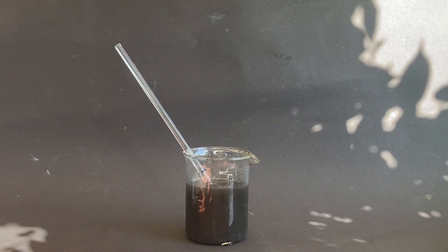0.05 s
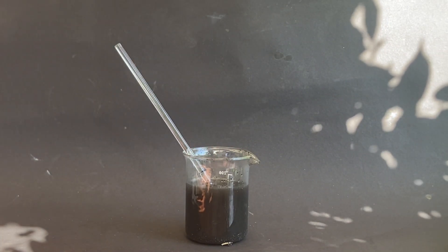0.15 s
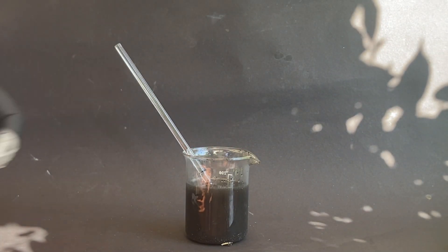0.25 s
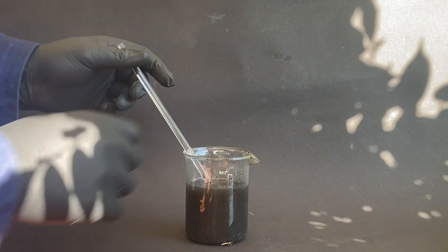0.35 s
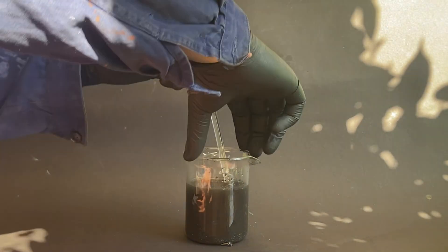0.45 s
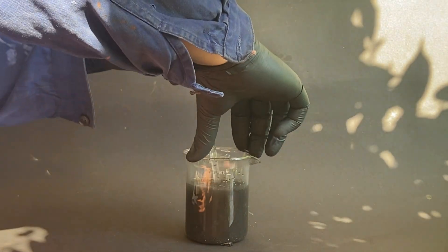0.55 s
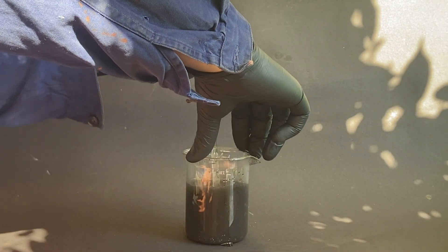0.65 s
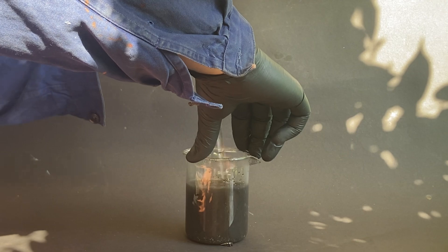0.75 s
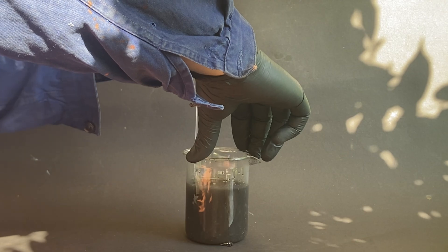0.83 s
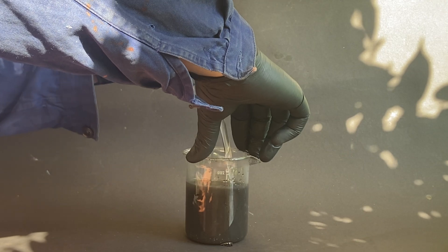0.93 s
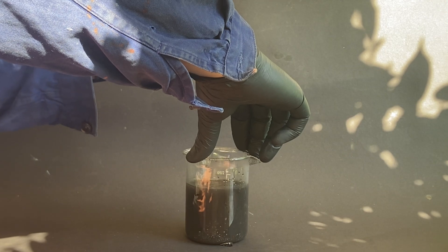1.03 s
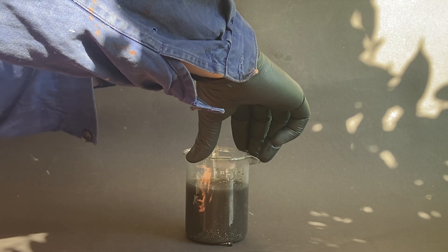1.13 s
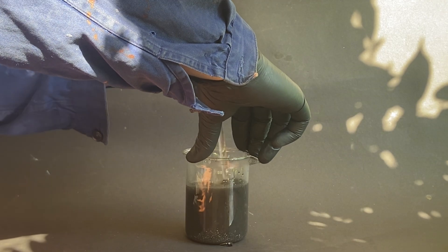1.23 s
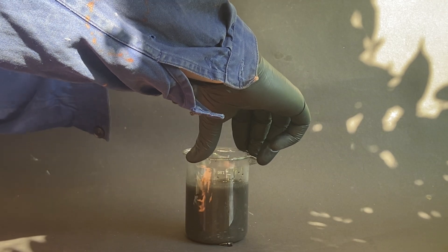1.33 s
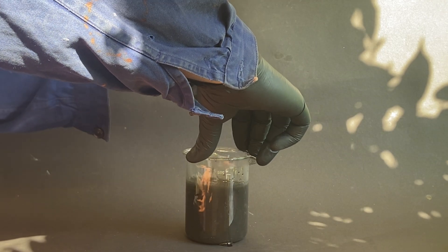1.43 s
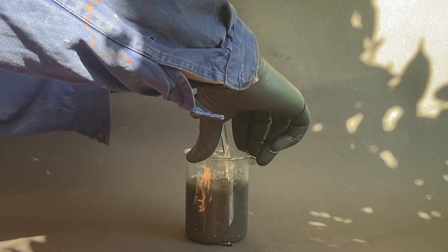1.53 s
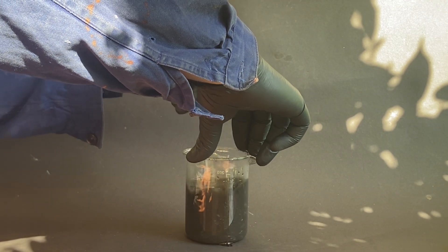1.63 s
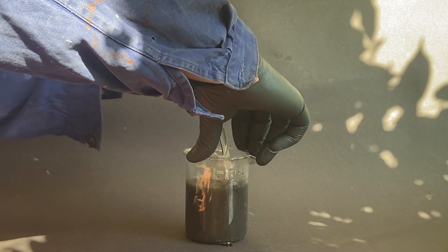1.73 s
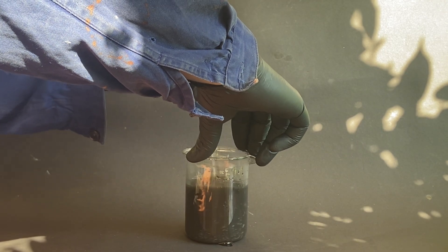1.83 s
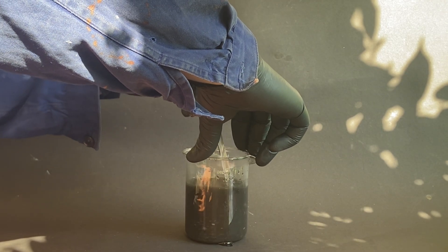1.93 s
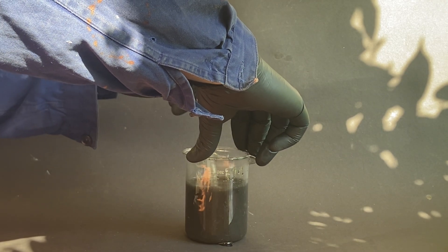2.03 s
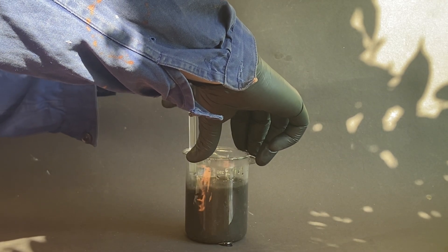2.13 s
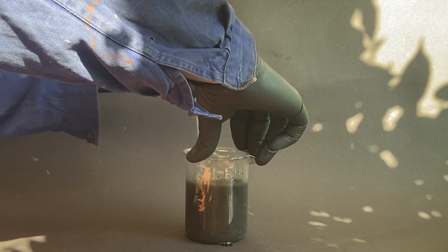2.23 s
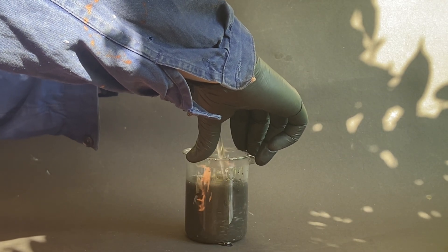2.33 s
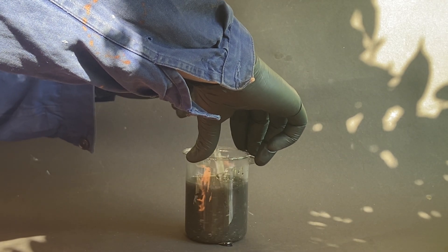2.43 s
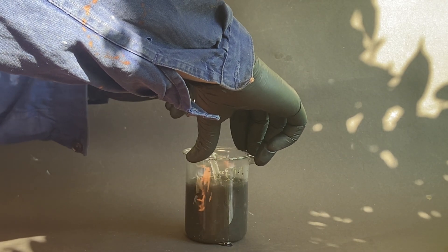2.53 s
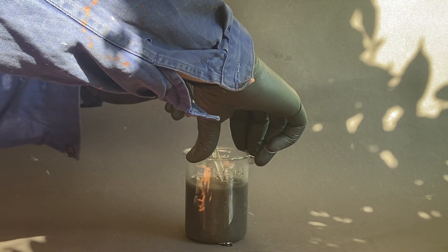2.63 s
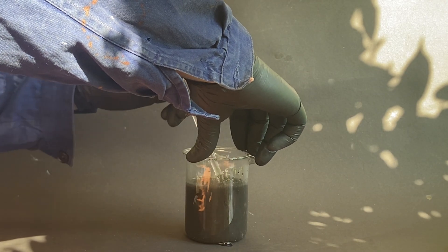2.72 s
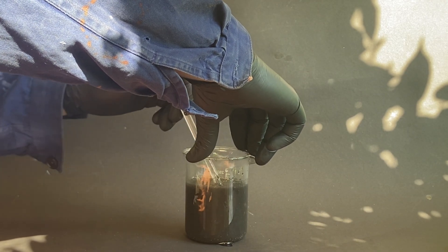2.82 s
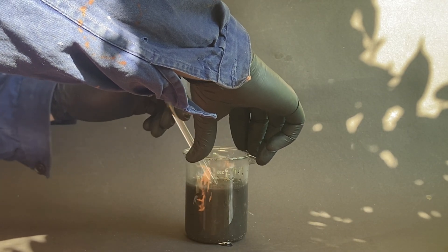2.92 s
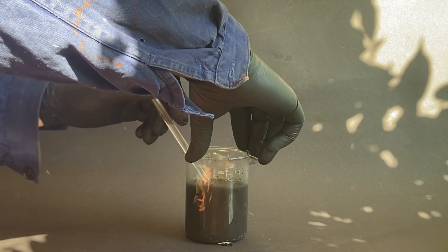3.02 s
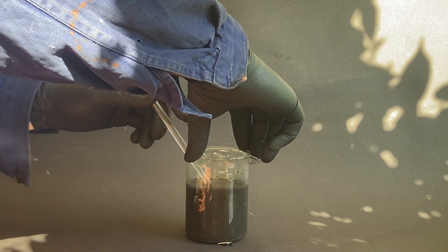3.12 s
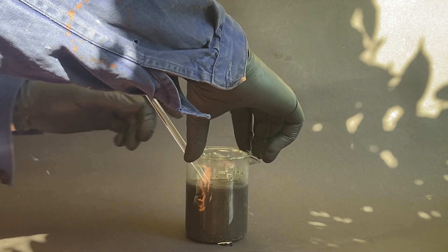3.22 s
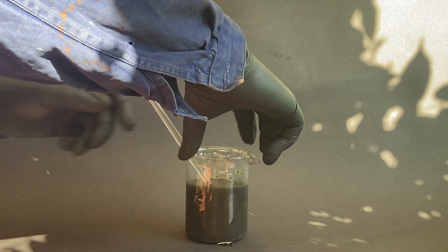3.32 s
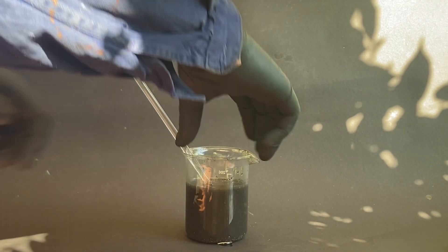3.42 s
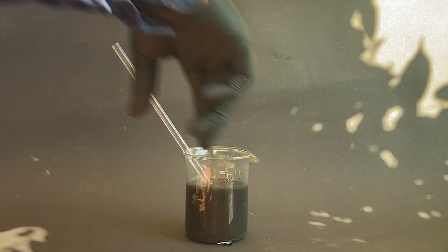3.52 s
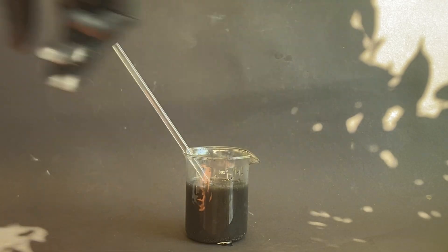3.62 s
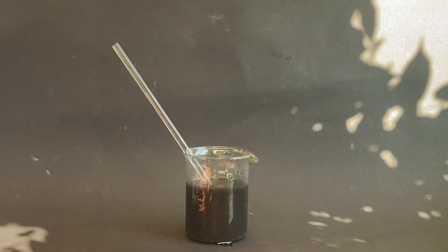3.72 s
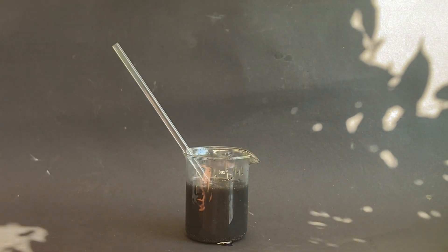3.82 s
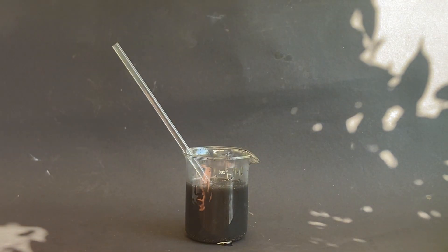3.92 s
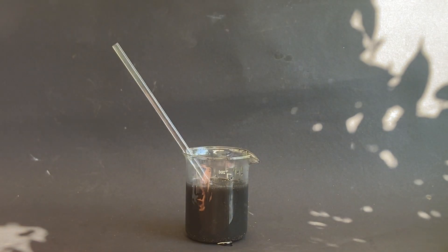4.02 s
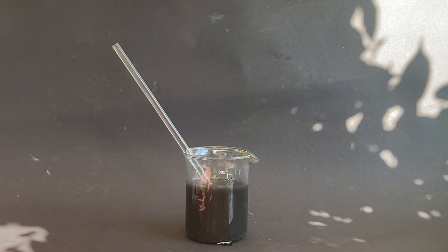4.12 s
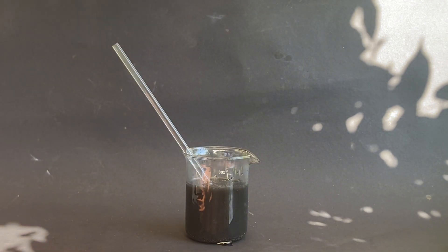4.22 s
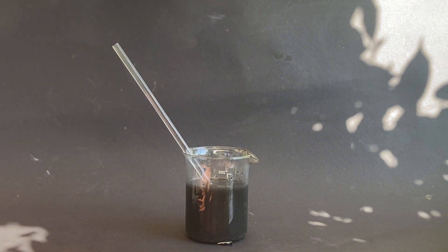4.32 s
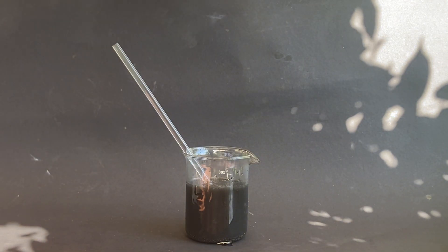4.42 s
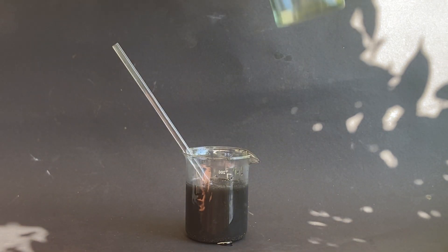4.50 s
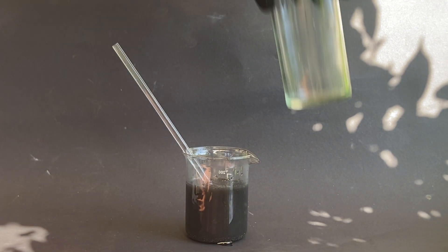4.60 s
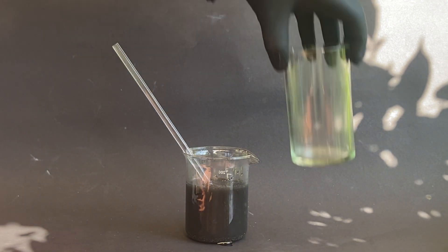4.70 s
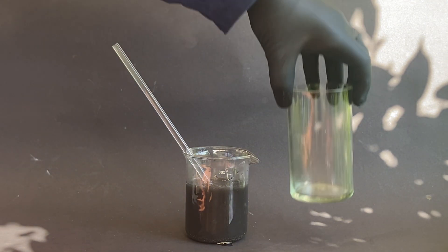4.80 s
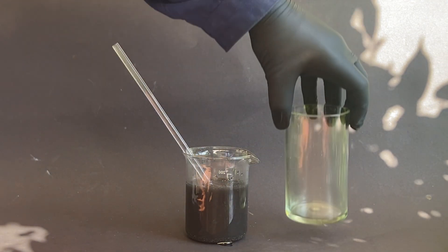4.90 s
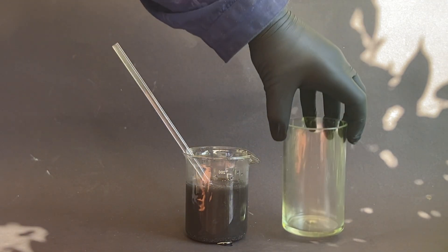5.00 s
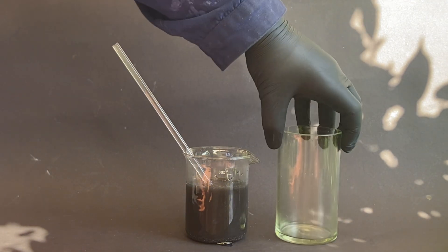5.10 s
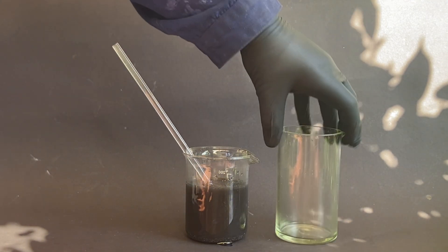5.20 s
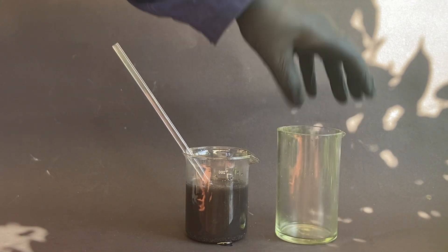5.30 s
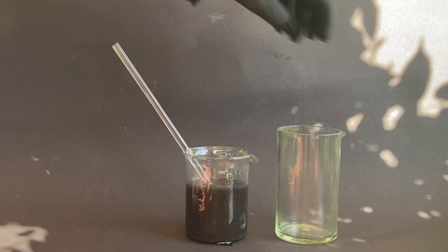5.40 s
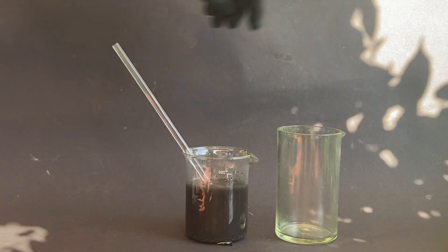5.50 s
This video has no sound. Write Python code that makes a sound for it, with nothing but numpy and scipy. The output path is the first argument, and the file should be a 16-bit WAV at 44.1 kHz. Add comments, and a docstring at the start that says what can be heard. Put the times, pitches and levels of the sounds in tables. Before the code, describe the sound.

Close and dry, outdoors in a quiet yard: one abrupt table knock, brief cloth rubbing, then about two seconds of irregular gritty stirring with small muted glass clicks. The rod strikes the rim brightly, and clinks again softer. Fabric swishes, near-silence with faint rumble, then a thick glass is put down with a boomy knock, while distant birds chirp weakly. Bass is thin at first, fuller and narrower later.

```python
"""First come soft outdoor rumble and sleeve rubs, with a hard knock at the edge of a hollow table.
Then a gloved hand stirs gritty slurry in a small beaker with a glass rod (gritty noise and ringing modes) and lets
it clink on the rim. Sleeves rustle (soft noise), far birds chirp (falling sines), a low thump is heard, and
an empty glass is set down (table modes, bright burst).
The recorder cuts the bass at first; later the stereo image is narrow."""
import sys
import numpy as np
from scipy import signal
from scipy.fft import rfft, irfft
from scipy.io import wavfile

SR = 44100
rng = np.random.default_rng(int(sys.argv[2]) if len(sys.argv) > 2 else 0)


def waveform_to_disk(signal):
    """Save audio, clipped to [-1, 1], as 16-bit WAV at the path in sys.argv[1]."""
    frames = np.transpose(np.atleast_2d(signal))
    scaled = np.clip(frames, -1, 1) * 32767
    samples = np.round(scaled).astype(np.int16)
    wavfile.write(sys.argv[1], SR, samples)


N = 244755

# Loudness of the surroundings over time. Columns: time_s, rumble_db, murmur_db, leaves_db
AIR_LEVELS = [(0, -79.5, -64, -65), (.46, -84.5, -63, -59), (.49, -85, -78, -73.5), (1.15, -80, -79, -67),
              (1.19, -83, -67, -62.5), (1.85, -76, -68, -61.5), (1.9, -79, -71, -61.5),
              (2.5, -74, -77, -61.5), (2.9, -71, -69, -70.5), (3.7, -77.5, -75.5, -67.5),
              (3.95, -66.5, -73, -65.5), (4.14, -81, -81, -71), (4.17, -64.5, -67, -69.5),
              (4.43, -61, -59.5, -66), (4.6, -62.5, -62, -68.5), (4.87, -56.5, -63.5, -71),
              (5.03, -60, -64, -73.5), (5.2, -52.5, -60.5, -70.5), (5.43, -66.5, -65.5, -68.5),
              (5.55, -62, -61, -66.5)]
# Colours of the noises: only the shape counts, not the overall level. Columns: pitch_hz, level_db
RUMBLE_COLOUR = [(13, -38), (22, -7), (52, 0), (64, 14), (77, 2.5), (123, -1.5), (220, -13.5), (290, -54.5),
                 (480, -120)]
MURMUR_COLOUR = [(76, -34), (130, -3), (294, 4), (372, -1), (567, 1), (1540, -15), (1810, -13), (2500, -15),
                 (3250, -59), (5500, -120)]
LEAVES_COLOUR = [(530, -4), (900, -6), (3200, -4), (5000, -11), (7000, -19), (9000, -18.5), (11300, -17),
                 (14000, -18), (15800, -38), (16100, -57)]
SLEEVE_COLOUR = [(1500, -18), (2600, -7), (4000, -6), (6000, -3), (7500, -5), (10000, -6.5), (13000, -8.5),
                 (15700, -11.5), (16100, -48)]
GRIT_COLOUR = [(1470, -48), (2500, -13.5), (3720, -9.5), (4840, -2.5), (7650, -7), (8330, -4.5),
               (12400, -9), (14100, -5.5), (16000, -25.5)]
CLACK_COLOUR = [(1200, 1), (2000, -4), (3500, -13.5), (6500, -11.5), (8500, -13), (11000, -5), (14000, 0),
                (16500, -13)]
# How alike left and right noise are (1 is the same). Columns: pitch_hz, likeness
LIKENESS = [(40, 1), (400, 0.9), (1100, 0.2), (2200, 0.79), (4000, 0.39), (8000, 0.79), (15000, 0.34)]
# Falling bird chirps. Columns: start_s, length_s, pitch_hz, fall_hz, level_db
CHIRPS = [(5.128, 0.078, 5500, 1500, -63.5), (5.325, 0.078, 5370, 1600, -61.5)]
# Thin steady tones. Columns: start_s, length_s, pitch_hz, level_db
TONES = [(-.03, 0.072, 487, -61), (0.157, 0.19, 494, -51.5), (0.316, 0.13, 498, -62),
         (.18, 0.33, 1497, -66.5), (2.95, 0.096, 3030, -69.5), (3.13, 0.1, 3130, -74),
         (3.447, 0.177, 3880, -70), (4.178, .09, 1850, -75), (4.304, 0.062, 3120, -68),
         (4.83, 0.078, 5740, -81)]
# Rustles of sleeve and glove. Columns: start_s, length_s, hiss_db, dull_part_db
RUSTLES = [(3.08, 0.039, -77, -67), (3.408, 0.43, -71.5, -74), (3.616, 0.13, -64.5, -91),
           (3.801, 0.1, -53, -67), (3.92, 0.12, -57.5, -83), (4.023, .12, -67, -75), (4.28, 0.3, -73, -79),
           (4.474, 0.097, -67, -62.5), (4.592, 0.25, -69, -69), (5.106, 0.071, -72.5, -83),
           (5.32, 0.18, -76.5, -82)]
# Modes of the table top. Columns: pitch_hz, ring_time_s (to fall 60 dB), edge_tap_db, middle_blow_db
TABLE_MODES = [(64, 0.78, -70, -47.5), (101.4, 0.41, -67, -33.5), (138.8, 0.17, -44, -26),
               (190.7, 0.24, -63, -30), (251.4, 0.14, -64, -21), (274.2, 0.16, -71, -27),
               (323, 0.1, -22, -15.5), (407, 0.023, -39, -50), (453, 0.051, -30.5, -17.5),
               (530, 0.06, -34, -15.5), (579, 0.21, -58, -44), (651, 0.09, -52, -8.5),
               (723, 0.047, -33, -28.5), (878, 0.043, -38, -21), (1040, 0.048, -47, -43),
               (1085, 0.011, -22.5, -5), (1350, 0.0076, -54, -17), (1600, 0.027, -32.5, -34.5),
               (1970, 0.022, -38, -14.5), (2500, 0.0099, -31, -31)]
# Blows on the table, and one low thump at 4.167 s made in the same way.
# Columns: time_s, level_db, spot (0 edge, 1 middle), sharpness_hz
KNOCKS = [(0.1106, 0.5, 0, 2480), (0.306, -27.5, 0, 1520), (2.593, -35, 1, 450), (3.058, -29.5, 1, 400),
          (3.796, -48.5, 1, 1510), (3.885, -42, 1, 300), (4.167, -40, 1, 253), (5.0673, -13.5, 1, 3090),
          (5.0712, -0.5, 1, 577), (5.109, -20, 1, 596)]
# The foot of the empty glass lands, grinds and rocks once. Columns: time_s, level_db
CLACK_LEVELS = [(5.063, -69), (5.0665, -32), (5.068, -31), (5.074, -39.5), (5.094, -47), (5.102, -43),
                (5.112, -50), (5.15, -79)]
# Modes of beaker and rod, damped by slurry and glove. Columns: pitch_hz, level_db, ring_time_s (to fall 60 dB)
GLASS_MODES = [(988, -1.5, 0.031), (1185, 5.5, 0.02), (1498, 2, 0.011), (1670, 4.5, 0.022),
               (1940, 10, 0.007), (2368, 5.5, 0.01), (2814, 2.5, 0.021), (3205, 8.5, 0.0053),
               (3896, 6, 0.0096), (4690, 10, 0.0046), (4825, -4.5, 0.012), (5670, -18, 0.02),
               (5904, 12, 0.0032), (6700, -8.5, 0.06), (6980, -1.5, 0.014), (8400, 4.5, 0.0132),
               (8490, 2, 0.048), (9690, 26, 0.0014), (10550, -1.5, 0.027), (11150, 11, 0.002),
               (13400, -20, .004), (14800, 17, 0.0016)]
# Two sleeve rubs at the start (first two rows), then strokes of the rod through the grit.
# Columns: start_s, length_s, hiss_db, beaker_tone_db, favoured_pitch_hz
STROKES = [(0.0, .2, -67, -60.5, 1470), (0.237, .225, -63, -62, 2460), (0.481, .25, -70.5, -71, 1840),
           (0.543, .16, -57, -71.5, 1830), (0.753, .008, -47, -57, 1670), (0.78, .06, -61, -68, 1800),
           (0.841, .11, -58, -69, 1780), (0.979, .155, -57.5, -69, 2110), (1.144, 0.068, -69, -63, 1680),
           (1.223, .13, -53.5, -57, 1600), (1.369, .06, -50.5, -55, 1863), (1.442, .28, -56.5, -60, 1600),
           (1.749, .13, -52.5, -54.5, 1600), (1.881, .19, -60, -55.5, 1410), (2.061, .045, -55, -52, 1780),
           (2.108, .015, -49, -42, 1840), (2.132, .17, -60, -51, 1880), (2.311, .018, -52, -48.5, 1820),
           (2.331, .13, -63.5, -64, 1663), (2.373, .022, -54, -45.5, 1720), (2.458, .11, -65.5, -53, 1590),
           (2.584, .05, -58.5, -62, 1800), (2.711, .02, -62, -50.5, 1380), (2.739, 0.018, -60, -49.5, 1350),
           (2.775, .035, -68, -57, 1500), (2.91, .12, -79, -63.5, 2500)]
# The rod squeaks on wet glass. Columns: start_s, length_s, pitch_hz, level_db
SQUEAKS = [(0.579, 0.031, 1670, -59), (0.9, 0.043, 1604, -62.5), (0.936, 0.037, 1620, -63),
           (1.297, 0.024, 1680, -61), (1.649, 0.018, 1700, -70), (1.699, 0.021, 1600, -50.5),
           (1.884, 0.076, 1940, -53), (1.887, 0.042, 1106, -50), (1.966, 0.055, 1080, -55),
           (0.402, 0.023, 3180, -45.5)]
# Clear contacts of rod with glass or grit.
# Columns: time_s, middle_modes_db, low_modes_db (against the middle ones), favoured_pitch_hz
TICKS = [(0.3884, -51.5, 14, 3030), (0.4119, -48, 10, 3100), (0.4174, -45, 5.5, 1650),
         (0.4562, -62, 6, 1650), (0.5288, -47.5, -31, 5660), (0.6317, -42.5, -7, 8100),
         (0.6638, -41, -13, 4850), (0.6878, -52, -18, 5830), (0.6974, -46.5, -6, 5040),
         (0.7206, -49, -24, 5460), (0.7549, -42.5, -27, 5140), (0.9974, -40.5, -32, 5470),
         (1.0354, -43.5, -5, 8250), (1.054, -37.5, -24, 6900), (1.073, -38.5, -23, 5630),
         (1.0858, -41.5, -21, 8800), (1.1179, -35, -16, 3590), (1.1365, -51.5, 4, 3280),
         (1.1628, -49, 5.5, 1330), (1.2506, -40, -7, 5560), (1.41, -40, -17, 8380),
         (1.4488, -33, -10, 5070), (1.502, -34.5, -13, 1660), (1.554, -36, -14, 1700),
         (1.6405, -38, -19, 4820), (1.665, -32.5, -12, 1670), (1.699, -33, -6, 1600),
         (1.7908, -37, -11, 4120), (1.8203, -36, -7, 1660), (1.8364, -35.5, 4.5, 1325),
         (1.854, -39, -32, 8100), (1.8705, -32.5, -10, 1620), (1.9504, -54, 14.5, 990),
         (2.0253, -38.5, 4, 1530), (2.0384, -49, 6, 1370), (2.1146, -36, 10, 2185), (2.1887, -42, 3, 1510),
         (2.2684, -44.5, 6, 967), (2.3145, -38.5, 0, 6700), (2.379, -36.5, -9, 1940),
         (2.4698, -41, 5.5, 1360), (2.523, -52.5, 12, 1300), (2.5876, -13, -8, 4995),
         (2.6005, -21.5, -5, 5050), (2.6071, -29.5, -2.5, 4830), (2.7117, -47, 14.5, 1274),
         (2.7444, -53, 12.5, 1240), (3.054, -21, -6.5, 1800), (3.0599, -23, -4, 1040),
         (3.7964, -61, -2, 5870), (4.7969, -48, -5, 1760)]
# Turn given to the high pitches of one channel. Columns: pitch_hz, turns
TURNS = [(7400, 0), (7700, .2), (8750, .47), (9300, .53), (10600, .87), (10900, 1), (11600, 1),
         (11900, 1.17), (13050, 1.47), (13650, 1.53), (14600, 1.8), (14900, 2)]

GUST_DB, MURMUR_DRIFT_DB = 0.5, 1.3  # spread of slow level changes
CHIRP_BEND, CHIRP_SWELL_DB = 3.8, 13  # the fall comes late; the note grows towards its end
BROKEN_DB = 4.5  # distant notes come and go with the air
RISE_S, FALL_S, SAG_DB = 0.02, 0.02, 2  # every stroke or rustle rises, sags and dies
STROKE_WOBBLE_DB, IDLE_DB = 2.5, -85  # unsteady drag; faint floor between gestures
GRAINS, GRAIN_OVER_HISS_DB, GRAIN_SPREAD_DB = 90, 7.5, 3.5
CONTACT_MS, LONGER_PER_OCTAVE = 2.25, 0.07  # fading time at 3 kHz; duller contacts last longer
BURST_LENGTH = 900  # samples
# High modes: level for a 3 kHz contact at -42.5 dB; gain with pitch; dB lost per dB of a harder contact
HIGH_DB, HIGH_DB_PER_OCTAVE, HIGH_LOSS_PER_DB = -5.5, 3, 0.2432
LOW_TOP_HZ, MIDDLE_TOP_HZ = 3400, 8200  # borders of low, middle and high modes
YARD_T60_S, YARD_DB = 0.1, -8
LATER_FROM_S, BASS_CUT_HZ, CUTOFF_HZ = 1.872, 230, 16600
EARLY_WIDE_UP_TO_HZ, LATER_WIDE_UP_TO_HZ = 9400, 2030  # independent left-right noise is kept only below this


def from_db(db):
    """Turn a level in dB into a gain."""
    return 10 ** (np.asarray(db) / 20)


def rms_one(x):
    """Scale a sound to an average strength (rms) of 1."""
    return x / np.sqrt(np.mean(x ** 2) + 1e-20)


def in_time(rows):
    """Draw the columns of a time table as curves with a value at every sample."""
    times, *columns = np.transpose(rows)
    return [np.interp(np.arange(N) / SR, times, column) for column in columns]


def at_hz(points, hz):
    """Read a table of pitches on a log pitch axis."""
    table_hz, values = np.transpose(points)
    return np.interp(np.log(hz), np.log(table_hz), values)


def drift(rate_hz):
    """Make a slow random wander of spread 1 by smoothing noise made at every 40th sample."""
    r = np.exp(-80 * np.pi * rate_hz / SR)
    noise = rng.standard_normal(N // 40 + 2002)
    slow = signal.lfilter([1], [1, -2 * r, r * r], noise)[2000:]  # skip the start-up
    return np.interp(np.arange(N) / 40, np.arange(len(slow)), rms_one(slow))


def ring(force, hz, t60):
    """Drive one mode: a unit click starts a sine of height about 1 that fades by 60 dB in t60 seconds."""
    r = from_db(-60 / (t60 * SR))
    w = 2 * np.pi * hz / SR
    return signal.lfilter([0, np.sin(w)], [1, -2 * r * np.cos(w), r * r], force + 1e-18)


def coloured(spectrum, white):
    """Filter two noises into stereo noise of rms 1, with the left-right likeness of the table."""
    hz = np.fft.rfftfreq(N + 1, 1 / SR) + 1
    alike = np.clip(at_hz(LIKENESS, hz), 0, 1)
    shares = np.sqrt([1 + alike, 1 - alike])
    shaped = rfft(white, N + 1) * shares * from_db(at_hz(spectrum, hz))
    mid, side = irfft(shaped, N + 1)[:, :N]
    return rms_one(np.array([mid + side, mid - side]))


def white_pair():
    """Draw two plain noises for coloured()."""
    return rng.standard_normal((2, N))


def nearness(hz, favoured_hz, octaves):
    """Say how strongly a mode answers a contact that favours another pitch."""
    return np.exp(-(np.log2(hz / favoured_hz) / octaves) ** 2)


def gestures(rows):
    """Shape the power of each stroke or rustle at every 32nd sample; short ones rise and die faster."""
    start, length = np.transpose(rows)[:2, :, None]
    t = np.arange(0, N, 32) / SR - start
    rise, fall = np.minimum(RISE_S, 0.29 * length), np.minimum(FALL_S, 0.77 * length)
    edge = np.clip(t / rise, 0, 1) * np.exp(-np.clip((t - length) / fall, 0, 30))
    sag = from_db(-SAG_DB * np.clip(t / length, 0, 1))
    return (edge * sag) ** 2


def level(shapes, db):
    """Add the powers of overlapping gestures and return the gain at every sample."""
    power = from_db(2 * np.asarray(db)) @ shapes + from_db(2 * IDLE_DB)
    return np.interp(np.arange(N), np.arange(0, N, 32), np.sqrt(power))


def air():
    """Outdoor rumble, murmur and hiss of leaves: three coloured noises that follow level curves."""
    rumble_db, murmur_db, leaves_db = in_time(AIR_LEVELS)
    rumble = from_db(rumble_db + GUST_DB * drift(3.5)) * coloured(RUMBLE_COLOUR, white_pair())
    murmur = from_db(murmur_db + MURMUR_DRIFT_DB * drift(8.5)) * coloured(MURMUR_COLOUR, white_pair())
    leaves = from_db(leaves_db) * coloured(LEAVES_COLOUR, white_pair())
    return rumble + murmur + leaves


def notes():
    """Bird chirps and thin tones: near sines that fade in and out, waver, and come and go with the air."""
    out = np.zeros(N)
    t = np.arange(N) / SR
    waver = 1 + 0.01 * drift(120)
    for start, length, hz, fall_hz, db in CHIRPS:
        u = np.clip((t - start) / length, 0, 1)
        fade = np.clip(np.minimum(u, 1 - u) * 9.5, 0, 1)
        swell = from_db(db - CHIRP_SWELL_DB * (1 - u))
        pitch = (hz - fall_hz * u ** CHIRP_BEND) * waver
        out += fade * swell * np.sin(2 * np.pi * np.cumsum(pitch) / SR)
    for start, length, hz, db in TONES:
        fade = np.sin(np.pi * np.clip((t - start) / length, 0, 1)) ** 0.26
        out += fade * from_db(db) * np.sin(2 * np.pi * np.cumsum(hz * waver) / SR)
    return out * from_db(BROKEN_DB * drift(30))


def yard(x):
    """Scattered reflections from table and walls: a short noise tail for each channel."""
    t = np.arange(SR // 4) / SR
    noise = rng.standard_normal((2, len(t))) * from_db(-60 * t / YARD_T60_S) * (t > 0.002)
    tail = 0.66 * noise[0] + 0.38 * noise[1] * np.array([[1], [-1]])
    tail /= np.sqrt(np.sum(tail ** 2) / 2)
    return signal.fftconvolve(x[None], tail, axes=1)[:, :N]


def rustling():
    """Sleeve and glove rub softly: smooth bright noise, swelling with each rustle."""
    cloth = from_db(1.5 * drift(15)) * coloured(SLEEVE_COLOUR, white_pair())
    return level(gestures(RUSTLES), np.transpose(RUSTLES)[2]) * cloth


def knocks():
    """A knock or thump rings the modes as they move at one spot; a soft one spares the high modes."""
    out = np.zeros(N)
    for k, (hz, t60, edge_db, middle_db) in enumerate(TABLE_MODES):
        blows = np.zeros(N)
        for time, db, spot, sharp_hz in KNOCKS:
            spot_db = middle_db if spot > 0.5 else edge_db
            blows[round(time * SR)] += from_db(db + spot_db) / (1 + (hz / sharp_hz) ** 2)
        sign = (-1) ** ((k + 2) // 3)  # groups of neighbouring modes start in step
        out += sign * ring(blows, hz, t60)
    return out


def clack():
    """Thick glass on a hard top: a dense bright noise burst without clear pitch."""
    t = np.arange(N) / SR
    sounding = (t > CLACK_LEVELS[0][0]) & (t < CLACK_LEVELS[-1][0])
    return sounding * from_db(in_time(CLACK_LEVELS)[0]) * coloured(CLACK_COLOUR, white_pair())


def grit(per_s, size_db, clump_db):
    """Grains of uneven size catch in clumps, over a smooth slide."""
    sizes = from_db(size_db * np.minimum(rng.exponential(1, N), 5)) * rng.choice([-1, 1], N)
    catches = sizes * (rng.random(N) < per_s / SR)
    slide = 0.75 * rng.standard_normal(N)
    return (rms_one(catches) + slide) * from_db(clump_db * drift(43))


def rubbing_hiss(drag):
    """Sleeve rubs at the start, then the rod in grit: bright noise as uneven as the drag itself."""
    gritty = coloured(GRIT_COLOUR, drag * rng.choice([-1, 1], (2, N)))
    return level(gestures(STROKES), np.transpose(STROKES)[2]) * gritty


def rubbed_modes(drag):
    """Rubbing drives the eight lowest glass modes; each row of STROKES favours modes near its own pitch."""
    strokes, cloth = np.transpose(STROKES), np.transpose(RUSTLES)
    modes = GLASS_MODES[:8]
    near = np.array([0.099 + nearness(hz, strokes[4], 0.36) for hz, db, t60 in modes])
    near /= np.sqrt(np.sum(near ** 2, axis=0))  # the modes share the power of a stroke
    shapes = np.concatenate([gestures(STROKES), gestures(RUSTLES)])
    cloth_db = cloth[3] - 10 * np.log10(len(modes))
    tone = np.zeros(N)
    for weight, (hz, db, t60) in zip(near, modes):
        drive_db = np.concatenate([strokes[3] + 20 * np.log10(weight), cloth_db])
        flicker = from_db(3.58 * drift(20.4))
        tone += level(shapes, drive_db) * flicker * rms_one(ring(drag, hz, 1.15 * t60))
    return from_db(-5.0) * tone


def squeaks():
    """Stick and slip lock onto one mode for a moment: a narrow, unsteady tone."""
    out = np.zeros(N)
    t = np.arange(N) / SR
    slip = rng.standard_normal(N)
    for start, length, hz, db in SQUEAKS:
        swell = np.sin(np.pi * np.clip((t - start) / length, 0, 1))
        out += from_db(db) * swell * rms_one(ring(slip, hz, 0.036))
    return out


def grains():
    """Scatter small contacts at chance moments, more where the rubbing is strong; rows are like TICKS."""
    hiss = level(gestures(STROKES), np.transpose(STROKES)[2])
    when, size, low, pitch = rng.random((GRAINS, 4)).T
    at = np.searchsorted(np.cumsum(hiss) / hiss.sum(), when)
    db = 20 * np.log10(hiss[at]) + GRAIN_OVER_HISS_DB + GRAIN_SPREAD_DB * (2 * size - 1)
    return np.transpose([at / SR, db, -20 + 20 * low, 1200 * 2 ** (2.8 * pitch)])


def ticks():
    """Each contact is a click in a short rough burst that drives low, middle and high glass modes unequally."""
    time, db, low_db, favoured_hz = np.concatenate([TICKS, grains()]).T[:, :, None]
    high_db = HIGH_DB + HIGH_DB_PER_OCTAVE * np.log2(favoured_hz / 3000) - HIGH_LOSS_PER_DB * (db + 42.5)
    shares = from_db([low_db, 0 * db, high_db])
    t = np.arange(BURST_LENGTH) / SR
    fall = CONTACT_MS / 1000 * (3000 / favoured_hz) ** LONGER_PER_OCTAVE
    rough = rng.standard_normal((len(time), BURST_LENGTH))
    rough[:, 8] += 5.0  # the click
    envelope = (1 - np.exp(-14.0 * t / fall)) * np.exp(-t / fall)
    bursts = rough * envelope / np.sqrt(1 + fall * SR / 8) * from_db(db - 14)  # longer bursts are weaker
    at = (np.round(time * SR).astype(int) + np.arange(BURST_LENGTH)).ravel()

    def force(gain):
        """Lay all bursts, each with its own gain, on one time line."""
        return np.bincount(at, (bursts * gain).ravel(), N + BURST_LENGTH)[:N] + 1e-18

    out = np.zeros(N)
    for k, (hz, mode_db, t60) in enumerate(GLASS_MODES):
        group = int(hz > LOW_TOP_HZ) + int(hz > MIDDLE_TOP_HZ)
        answer = 0.35 + 1.7 * nearness(hz, favoured_hz, 0.095)
        out += (-1) ** k * from_db(mode_db) * ring(force(shares[group] * answer), hz, t60)
    bands = [(700, LOW_TOP_HZ), (LOW_TOP_HZ, MIDDLE_TOP_HZ), (MIDDLE_TOP_HZ, 17000)]
    for band, share in zip(bands, shares):  # the contact noise itself
        sos = signal.butter(2, band, "band", fs=SR, output="sos")
        out += from_db(23) * signal.sosfilt(sos, force(share))
    return out


def scene():
    """Air and birds around; friction, clinks and knocks close by."""
    drag = grit(per_s=4000, size_db=4.5, clump_db=2.0) * from_db(STROKE_WOBBLE_DB * drift(7.3))
    background = air() + notes()
    rubbing = rustling() + rubbing_hiss(drag) + rubbed_modes(drag) + squeaks()
    clinks, thuds = ticks(), knocks()
    reflected = from_db(YARD_DB) * yard(clinks + from_db(-9) * thuds)  # long waves scatter little
    low_and_bright = thuds * from_db([[0.3], [-0.3]]) + clack()  # thuds lean slightly left
    return background + reflected + rubbing + low_and_bright + clinks


def narrowed(x, hz):
    """Above hz both channels carry the same sound."""
    sos = signal.butter(12, hz, fs=SR, output="sos")
    side = signal.sosfilt(sos, (x[0] - x[1]) / 2)
    return x.mean(axis=0) + side * [[1], [-1]]


def record(dry):
    """Thin bass at first, then full bass and a narrow image; the top is cut."""
    bass_cut = signal.butter(5, BASS_CUT_HZ, "high", fs=SR, output="sos")
    early = signal.sosfilt(bass_cut, narrowed(dry, EARLY_WIDE_UP_TO_HZ))
    turns = np.interp(np.fft.rfftfreq(N + 1, 1 / SR), *np.transpose(TURNS))
    spin = np.exp(2j * np.pi * turns * [[0], [1]])  # acts on the second channel only
    later = irfft(rfft(narrowed(dry, LATER_WIDE_UP_TO_HZ), N + 1) * spin, N + 1)[:, :N]
    blend = np.clip((np.arange(N) / SR - LATER_FROM_S) / 0.01, 0, 1)
    deep_cut = signal.butter(2, 35, "high", fs=SR, output="sos")
    out = signal.sosfilt(deep_cut, early + blend * (later - early))
    return signal.sosfilt(signal.cheby2(14, 60, CUTOFF_HZ, fs=SR, output="sos"), out)


dry = scene()
out = record(dry)
waveform_to_disk(out)
```